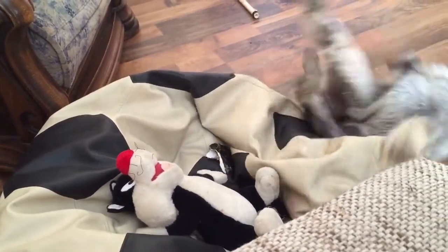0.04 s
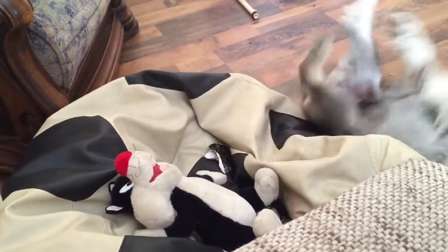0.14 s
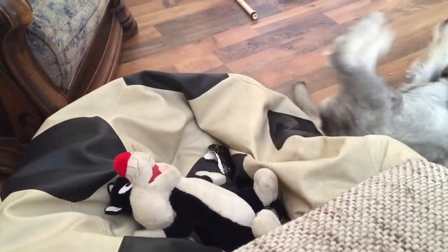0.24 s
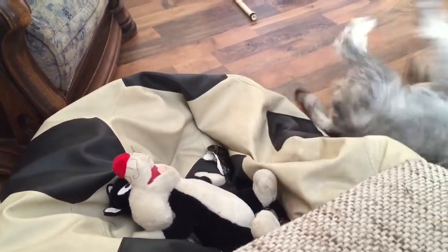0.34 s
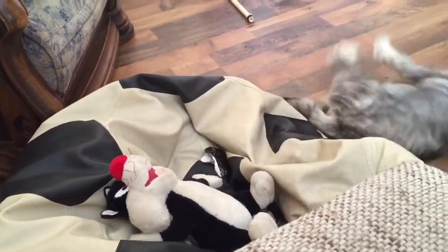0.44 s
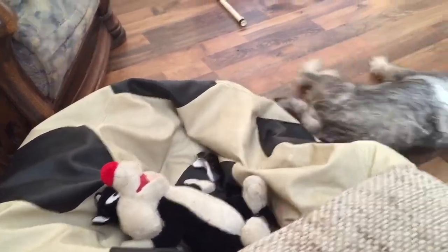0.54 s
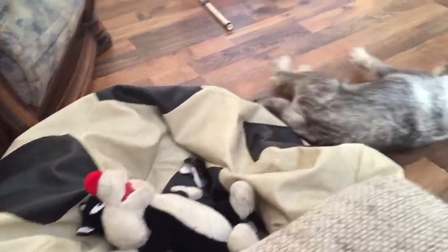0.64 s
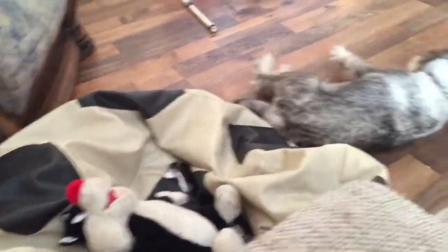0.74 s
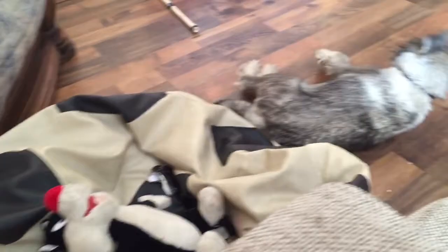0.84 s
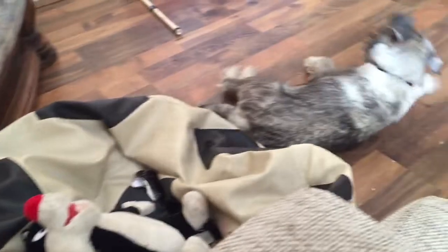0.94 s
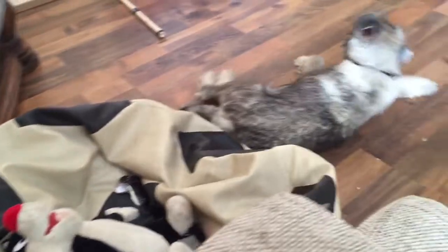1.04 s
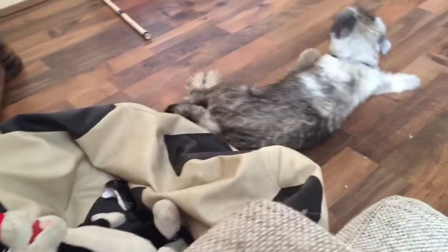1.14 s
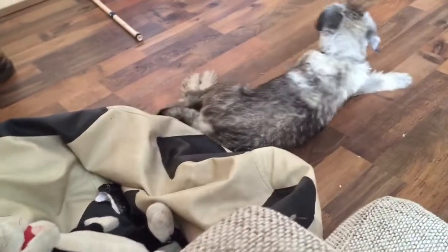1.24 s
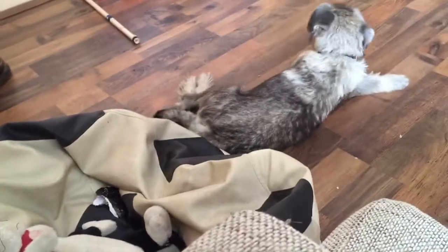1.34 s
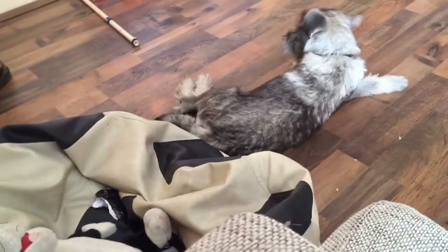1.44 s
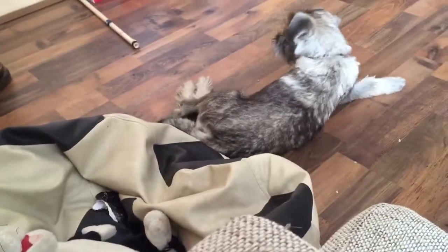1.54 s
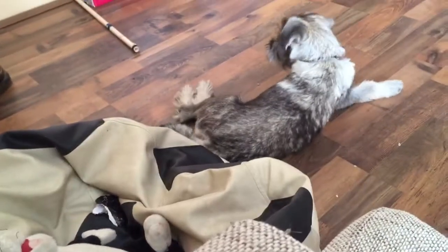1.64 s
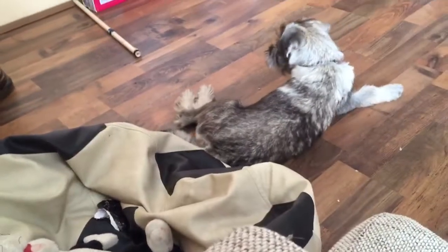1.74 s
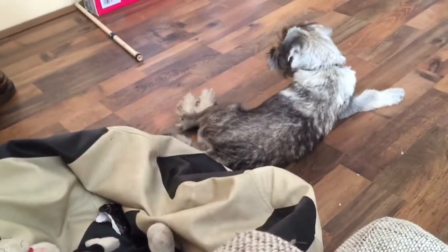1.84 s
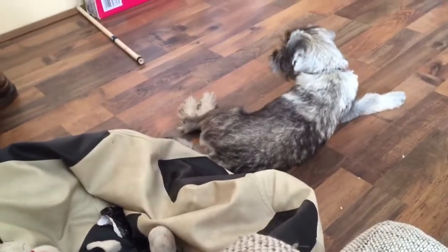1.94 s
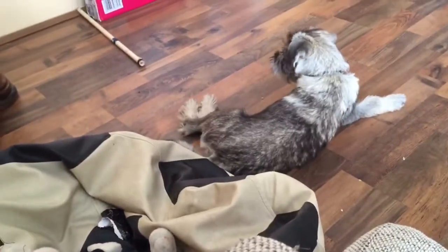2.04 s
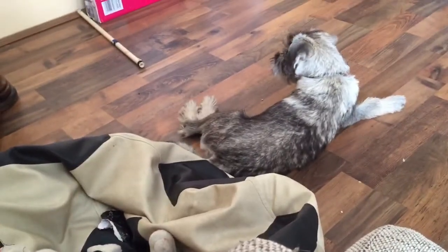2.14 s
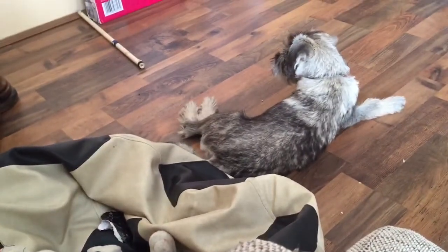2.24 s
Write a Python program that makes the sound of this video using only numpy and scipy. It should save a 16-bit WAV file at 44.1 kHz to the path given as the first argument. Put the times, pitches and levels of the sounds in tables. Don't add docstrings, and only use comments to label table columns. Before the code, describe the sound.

Small dog flopping on a wood floor: short cloth rubbing, a body thump, a sharper bony knock, a few bright claw clicks, then near quiet with faint fur shifting and hum in a reverberant room.

```python
import sys
import numpy as np
from scipy import signal
from scipy.io import wavfile

SR = 44100
rng = np.random.default_rng(int(sys.argv[2]) if len(sys.argv) > 2 else 0)


def pcm_store(signal):
    levels = np.round(np.clip(np.atleast_2d(signal), -1, 1) * 32767)
    wavfile.write(sys.argv[1], SR, levels.astype(np.int16).T)


def gain_from_db(level_db):
    decades = np.asarray(level_db, float) / 20
    return 10 ** decades


N = 101430

# t/s, level/dB
CLOTH_LEVEL = [(0, -55.5), (.09, -54.5), (.17, -53.5), (.22, -55.5), (.26, -55.5), (.3, -68), (.36, -85),
               (.41, -56.5)]
# t/s, top f/Hz
CLOTH_TOP = [(0, 4570), (.03, 3670), (.07, 3230), (.13, 4627), (.175, 4530), (.19, 3014), (.23, 2700),
             (.3, 2000), (.41, 3010)]
# f/Hz, level/dB per Hz
CLOTH_COLOUR = [(55, -34.5), (100, -13.5), (350, 1), (600, -4), (2200, -5.5), (4300, -14), (5200, -17.5),
                (14000, -13.5)]
# t/s, level/dB
FUR_LEVEL = [(.45, -94), (.6, -79.5), (.8, -79.5), (.93, -74.5), (1.02, -77.5), (1.1, -72), (1.18, -79),
             (1.3, -77), (1.5, -84), (1.9, -82.5), (2.1, -79.5), (2.3, -80.5)]
# f/Hz, level/dB per Hz
FUR_COLOUR = [(300, -3), (1500, -4), (5000, -1.5), (7000, -8.5), (8800, -2), (10000, -4), (11000, -13),
              (14000, -17.5)]
# t/s, peak level/dB, pitch f/Hz, crack level/dB, share sent to the room/dB, t60/s
KNOCKS = [
    (.0700, -50, 800, -70, -4, .008),
    (.0950, -49, 340, -70, -3, .016),
    (.1050, -48, 300, -70, -4, .014),
    (.1200, -50, 400, -70, -4, .014),
    (.2085, -37, 820, -66, -9, .007),
    (.2211, -22.5, 680, -58, -6, .006),
    (.2213, -33, 1050, -80, -16, .005),
    (.4153, -19, 720, -38, 0, .008),
    (.4166, -30, 1050, -80, -8, .006),
]
# f/Hz, level/dB per Hz
CRACK_COLOUR = [(700, -6), (1300, -0.5), (2100, 15.5), (3300, 9), (4400, -28), (5500, -16), (9000, -40),
                (15000, -45)]
# t/s, level/dB
THUDS = [
    (0.2218, -28),
    (.285, -44.5),
    (0.311, -45),
    (0.415, -35.5),
]
# f/Hz, level/dB, t60/s, lag/s
BOARDS = [(57.75, -17, 0.1, 0.015), (90.5, -11, .2, .012), (117.3, -3, 0.11, 0.016), (140, -11, .13, .012),
          (180, -14, .2, .01), (221.3, -6, 0.22, .008), (289, -3.5, 0.11, .004), (340, -9.5, .1, 0.0032),
          (404, -13.5, 0.11, 0.0015), (546.4, -10, 0.07, 0.0043)]
# f/Hz, level/dB, t60/s
KNOCK_MODES = [(530.4, -27.5, .45), (565, -29, .4), (678, -15.5, .35), (634, -17, 0.49), (785, -37.5, 0.34),
               (940, -19.5, 0.37), (1081, -22, .2), (1184, -35, 0.49), (1690, -37, .28), (2160, -42.5, .3),
               (2564, -40, 0.44), (2467, -43, .4), (3410, -46, 0.31), (4100, -51, 0.38)]
# t/s, level/dB
SWAY_LEVEL = [(.15, -100), (.19, -60.5), (.33, -53.5), (.45, -62), (.6, -57), (.7, -66), (.75, -100)]
# t/s, peak level/dB, pitch
# f/Hz, t60/s
TICKS = [(0.0311, -46, 1360, 0.018), (0.151, -42, 1470, 0.01), (0.171, -51, 2010, .02),
         (0.212, -47, 2550, 0.005), (0.254, -46, 1500, 0.014), (.291, -61, 3650, 0.014),
         (0.317, -62, 3610, .012), (.389, -47, 1139, .01), (0.4152, -55, 3100, 0.0091),
         (.4142, -42, 3500, 0.015), (.4148, -39.5, 2290, .01), (.416, -32, 1750, .012),
         (.4215, -44.5, 2313, 0.011), (0.6028, -46, 3130, 0.012), (0.604, -46, 5730, 0.0085),
         (0.605, -55, 7100, 0.0052), (0.6073, -51, 5300, 0.0055), (0.606, -45, 4470, 0.02),
         (0.607, -59, 4010, 0.02), (0.61, -50.5, 3200, 0.015), (0.6143, -52, 3300, 0.011),
         (0.649, -56, 5640, 0.01), (0.6539, -46.5, 3900, 0.036), (0.6578, -38.5, 4120, 0.012),
         (0.66, -49, 3890, 0.015), (.665, -50, 3760, 0.018), (0.668, -51, 5760, 0.015),
         (.674, -56, 5530, .012)]
# t/s, level/dB, attack/s, release/s, top f/Hz
SCUFFS = [
    (.2525, -58, .002, .006, 8000),
    (.258, -54, .005, .02, 4900),
    (.4150, -44, .0008, .011, 3600),
    (.425, -55, .004, .055, 4600),
    (.43, -68, .01, .07, 7200),
    (.6030, -57, .0005, .0015, 10000),
    (.615, -61, .004, .006, 6800),
    (.656, -60, .008, .012, 6000),
    (.660, -69, .008, .01, 14500),
    (1.10, -67, .012, .015, 14800),
]
# f/Hz, t60/s
ROOM_T60 = [(60, 0.24), (300, 0.78), (700, 0.77), (2000, 0.64), (5000, 0.8), (12000, 1)]
# f/Hz, level/dB
ROOM_COLOUR = [(100, 0), (350, 2), (550, 4), (700, -10.5), (1000, 2.5), (1500, 4.5), (2500, -4.5),
               (8000, -1)]
# lag/s, level/dB
ECHOES = [(.0034, -4), (.0087, -7), (.0122, -8), (.0165, -13), (.033, -11), (.048, -13)]
# f/Hz, level/dB
AIR_COLOUR = [(15, -49), (25, -23), (95, -24), (131, -3.5), (202, -10.5), (231, -1), (404, -12.5),
              (637, -12), (15000, -28)]
# t/s, share/0-1
RUMBLE_CUT = [(0, 1), (.14, 1), (.18, 0), (2.3, 0)]
# f/Hz, width/Hz, level/dB
HUM = [(99, 18, -72.5), (177, 11, -81), (199.86, 2.5, -76)]
# t/s, level/dB
HUM_SWELL = [(0, -1), (.8, -6.5), (.92, 5), (1.1, 1.5), (1.25, -5.5), (1.5, 2), (1.85, 1), (1.95, -6.5),
             (2.3, 2)]
# t/s, level/dB
BACKGROUND_GAIN = [(0, 7.5), (.6, 4), (.75, 3), (1.0, 0.5), (1.5, -0.5), (2.3, -1.5)]
# t/s, level/dB
ACTION_GAIN = [(0, 0), (.64, 0), (.72, -6), (.8, -11), (1.0, -14), (2.3, -14)]
# f/Hz, width/Hz, depth/0-1
MIC_DIPS = [(5070, 900, 0.3), (10660, 1500, 0.5)]


def rms_one(x):
    return x / np.sqrt(np.mean(x ** 2) + 1e-20)


def in_time(rows):
    s, value = np.transpose(rows)
    return np.interp(np.arange(N) / SR, s, value)


def at_hz(points, hz):
    table_hz, value = np.transpose(points)
    return np.interp(np.log(hz), np.log(table_hz), value)


def filtered(x, order, hz, kind="low"):
    return signal.sosfilt(signal.butter(order, hz, kind, fs=SR, output="sos"), x)


def drift(rate_hz):
    r = np.exp(-2 * np.pi * rate_hz * 40 / SR)
    noise = rng.standard_normal(N // 40 + 2002)
    slow = signal.lfilter([1], [1, -2 * r, r * r], noise)[2000:]
    return np.interp(np.arange(N) / 40, np.arange(len(slow)), rms_one(slow))


def ring(clicks, hz, t60):
    r, w = gain_from_db(-60 / (t60 * SR)), 2 * np.pi * hz / SR
    return signal.lfilter([0, np.sin(w)], [1, -2 * r * np.cos(w), r * r], clicks + 1e-18)


def click(s, db):
    out = np.zeros(N)
    out[int(s * SR)] = gain_from_db(db)
    return out


def bands(sources, gain):
    edges = 22 * 2 ** np.arange(0, 9.6, .5)
    total = 0
    for k, (lo, hi) in enumerate(zip(edges, edges[1:])):
        total = total + gain(np.sqrt(lo * hi)) * filtered(sources[k % 2], 2, [lo, hi], "band")
    return total


def rustle(colour, level_db, top_hz, patchy_db):
    grains_per_s, spread_db = 4000, 2.5
    present = rng.random((2, N)) < grains_per_s / SR
    size = gain_from_db(spread_db * np.minimum(rng.exponential(1, (2, N)), 4))
    grains = present * size * rng.choice([-1, 1], (2, N))
    shared = drift(15)

    def gain(hz):
        patchy = patchy_db * (shared + drift(25))
        return gain_from_db(at_hz(colour, hz) + patchy) / np.sqrt(1 + (hz / top_hz) ** 6)

    return gain_from_db(level_db) * rms_one(bands(grains, gain))


def cloth_slide():
    leaving = np.clip((.44 - np.arange(N) / SR) / .04, 0, 1)
    cloth = rustle(CLOTH_COLOUR, in_time(CLOTH_LEVEL) + 2.5, in_time(CLOTH_TOP), patchy_db=1.1)
    return filtered(leaving * cloth, 4, 130, "high")


def room_tone():
    noise = rng.standard_normal((2, N))
    air = rms_one(bands(noise, lambda hz: gain_from_db(at_hz(AIR_COLOUR, hz) + 0.2 * drift(17))))
    lines = []
    for hz, width, db in HUM:
        lines.append(gain_from_db(db) * rms_one(ring(rng.standard_normal(N), hz, 1.6 / width)))
    hum = gain_from_db(in_time(HUM_SWELL)) * lines[0] + sum(lines[1:])
    tone = gain_from_db(-72.5) * air + hum
    cut = in_time(RUMBLE_CUT)
    return cut * filtered(tone, 4, 90, "high") + (1 - cut) * tone


def ticks():
    t = np.arange(N) / SR
    touches = sum(ring(click(s, db), hz, t60) for s, db, hz, t60 in TICKS)
    out = filtered(touches, 2, 7500)
    for s, db, attack, release, top_hz in SCUFFS:
        hiss = filtered(rng.standard_normal(N), 4, [0.35 * top_hz, top_hz], "band")
        swell = np.exp(-np.where(t < s, (s - t) / attack, (t - s) / release))
        out = out + gain_from_db(db) * rms_one(hiss) * swell
    return out


def room():
    first_echo_s = 0.0078
    t = np.arange(SR) / SR
    noise = rng.standard_normal((2, SR))
    tail = bands(noise, lambda hz: gain_from_db(at_hz(ROOM_COLOUR, hz) - 60 * t / at_hz(ROOM_T60, hz)))
    early = np.zeros(SR)
    for lag, db in ECHOES:
        early[int(lag * SR)] = gain_from_db(db)
    return early, tail * (t > first_echo_s)


def knocks():
    pop, send = np.zeros(N), np.zeros(N)
    crack_fade = gain_from_db(-60 * np.arange(2000) / SR / .0004)
    for s, db, hz, crack_db, send_db, pop_t60 in KNOCKS:
        hit = ring(ring(click(s, 0), hz, pop_t60), hz, pop_t60)
        hit = hit / np.abs(hit).max() * gain_from_db(db)
        burst = np.abs(rng.standard_normal((2, 2000))) * crack_fade
        crack = bands(burst, lambda band_hz: gain_from_db(at_hz(CRACK_COLOUR, band_hz)))
        crack = crack / np.abs(crack).max()
        hit = hit + signal.fftconvolve(click(s - .0012, crack_db + 1.0), crack)[:N]
        send += gain_from_db(send_db) * hit
        pop += hit
        for mode_hz, level_db, t60 in KNOCK_MODES:
            pop += ring(click(s + .003, db + send_db + level_db), mode_hz, t60)
    return pop, send


def board_thuds():
    thud = np.zeros(N)
    for s, db in THUDS:
        for hz, level_db, t60, lag in BOARDS:
            thud += ring(click(s + lag, db + level_db), hz, t60)
    return filtered(thud, 2, 600)


def joists():
    pitch_hz = 40 * (1 + .03 * drift(3))
    return np.sqrt(2) * gain_from_db(in_time(SWAY_LEVEL)) * np.sin(2 * np.pi * np.cumsum(pitch_hz) / SR)


def fur_settle():
    return rustle(FUR_COLOUR, in_time(FUR_LEVEL), SR, patchy_db=.4)


def scene():
    cloth = cloth_slide()
    background = gain_from_db(in_time(BACKGROUND_GAIN)) * room_tone()
    tick = ticks()
    early, tail = room()
    pop, send = knocks()
    thud = board_thuds()
    wet = signal.fftconvolve(send, early + gain_from_db(-29.5) * tail)
    wet = wet + signal.fftconvolve(thud, gain_from_db(-40) * tail)
    wet = wet + signal.fftconvolve(tick, gain_from_db(-36) * tail)
    action = (pop + thud + tick + cloth + wet[:N]) * gain_from_db(in_time(ACTION_GAIN))
    return (action + joists() + fur_settle() + background)[None]


def roll_off(x):
    return signal.sosfilt(signal.butter(12, 15200, fs=SR, output="sos"), x)


def record(dry):
    mix = filtered(dry, 4, 32, "high")
    mix = signal.sosfilt(signal.ellip(12, .5, 60, 15250, fs=SR, output="sos"), mix)
    for hz, width, depth in MIC_DIPS:
        mix = mix - depth * filtered(mix, 1, [hz - width / 2, hz + width / 2], "band")
    return roll_off(mix)


dry = scene()
out = record(dry)
pcm_store(out)
```